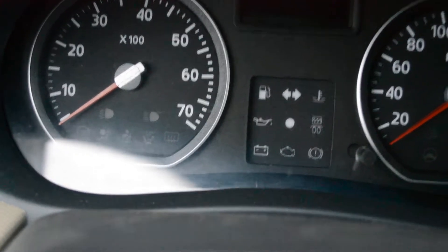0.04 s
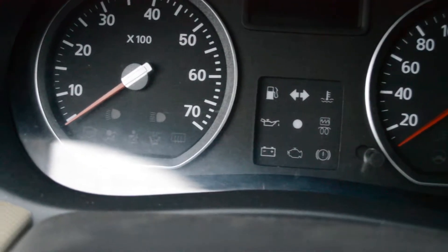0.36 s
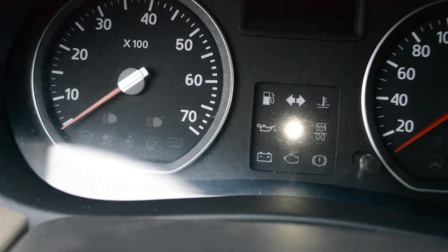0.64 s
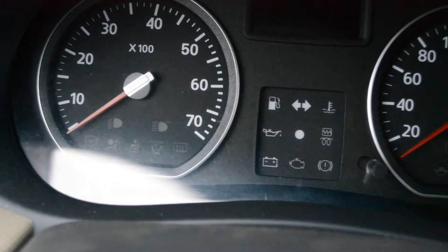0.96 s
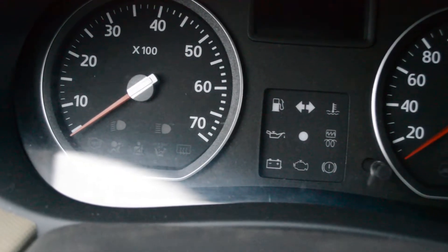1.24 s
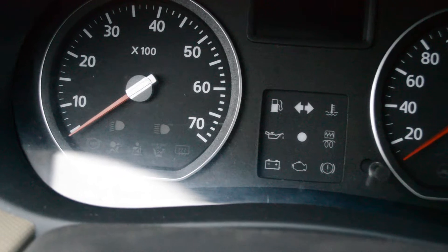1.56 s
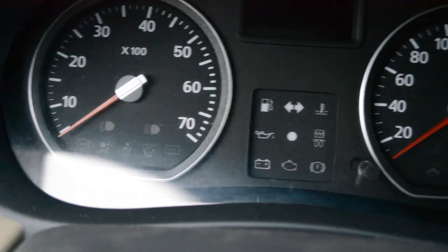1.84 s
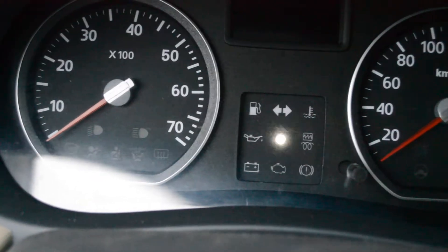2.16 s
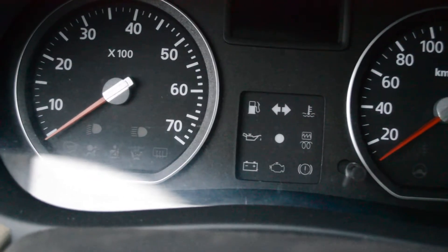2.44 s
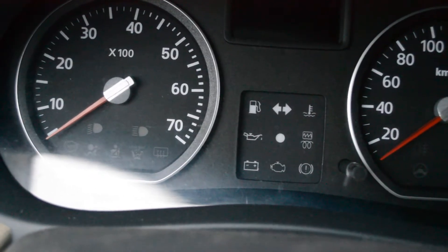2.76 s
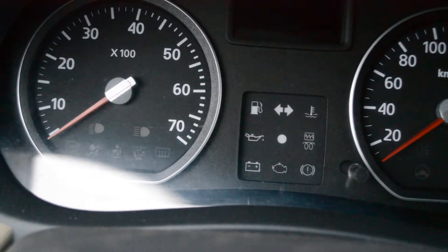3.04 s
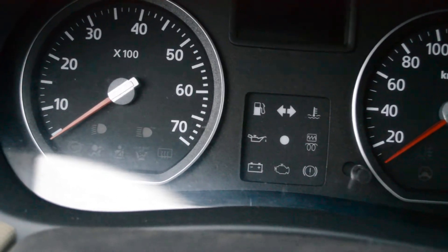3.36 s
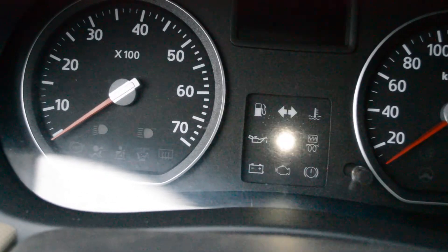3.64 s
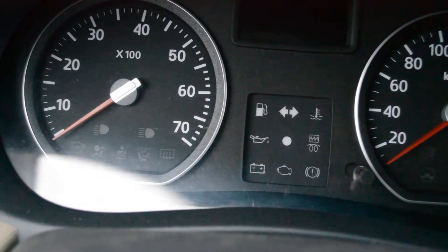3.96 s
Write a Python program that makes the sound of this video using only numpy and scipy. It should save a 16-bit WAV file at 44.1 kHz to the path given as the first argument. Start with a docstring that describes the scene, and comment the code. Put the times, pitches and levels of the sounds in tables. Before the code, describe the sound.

Sparse, close clicks of a key and plastic controls in a quiet car cabin: one sharp snap, brief scrapes, scattered soft ticks and bumps, and finally two clacks, over a faint sleeve rustle and low wavering hum.

```python
"""Key and controls in a parked car

A key and plastic controls are handled, close and dry. Impacts excite damped modes and brief noise:
one hard snap, light ticks, dull knocks and two gritty clacks. Friction gives short scrapes and a faint
rustle of cloth. Under it lie a low wavering hum, cabin air and the thin whine of a camera."""
import sys
import numpy as np
from scipy import signal
from scipy.fft import rfft, irfft, next_fast_len
from scipy.io import wavfile
from scipy.ndimage import map_coordinates

SR = 44100
rng = np.random.default_rng(int(sys.argv[2]) if len(sys.argv) > 2 else 0)


def waveform_to_disk(signal):
    """Save audio, clipped to [-1, 1], as 16-bit WAV at the path in sys.argv[1]."""
    frames = np.transpose(np.atleast_2d(signal))
    scaled = np.clip(frames, -1, 1) * 32767
    samples = np.round(scaled).astype(np.int16)
    wavfile.write(sys.argv[1], SR, samples)


N = 176400
T = np.arange(N) / SR
AGE = np.arange(SR // 4) / SR  # time since a contact began [s]

# spectrum of soft contact with trim or seat: (frequency [Hz], level [dB])
SOFT_CONTACT_SPECTRUM = [(100, -21), (410, 4), (630, -4), (810, -0.5), (1200, -8.5), (2600, -9.5),
                         (5000, -29.5), (14000, -40)]


def amp(db):
    """Amplitude ratio of a level in decibels."""
    return 10 ** (np.asarray(db) / 20)


def unit(x):
    """Normalisation to an rms of 1."""
    return x / np.sqrt(np.mean(x ** 2) + 1e-20)


def along(points, hz):
    """Interpolation of (frequency [Hz], value) points on a logarithmic frequency axis."""
    freqs, values = np.transpose(points)
    return np.interp(np.log(hz + 1), np.log(freqs + 1), values)


def filtered(x, response):
    """Linear filtering: the spectrum of x is multiplied by a frequency response."""
    size = next_fast_len(x.shape[-1] + SR // 10)
    spectrum = rfft(x, size) * response(np.fft.rfftfreq(size, 1 / SR))
    return irfft(spectrum, size)[..., :x.shape[-1]]


def noise(spectrum, size, tilt=0):
    """Spectral shaping of white noise to rms 1; tilt [dB/octave] acts above about 100 Hz."""
    response = lambda hz: amp(along(spectrum, hz) + tilt * np.log2(1 + hz / 100))
    return unit(filtered(rng.standard_normal(size), response))


def wobble(per_s, t):
    """Random modulation: a smooth curve through per_s random values a second."""
    return map_coordinates(rng.standard_normal(len(t) // 8), [t * per_s], mode="wrap")


def grain(t, depth_db, per_s):
    """Random amplitude modulation, heard as roughness."""
    return amp(depth_db * wobble(per_s, t))


def fade(t60, t=AGE):
    """Exponential decay by 60 dB in t60 seconds."""
    return np.exp(-np.log(1000) * np.maximum(t, 0) / t60)


def add(track, start, sound):
    """Superposition of a sound on the track from start [s]."""
    i = round(start * SR)
    track[i:i + len(sound)] += sound[:N - i]


def burst(spectrum, rise_s, decay, tilt=0, order=1):
    """Frequency-dependent damping: noise bands rise, then die by decay (frequency [Hz], t60 [s])."""
    centres = np.geomspace(100, 16000, 9)
    envelope = lambda hz: np.minimum(AGE / rise_s, 1) ** order * fade(along(decay, hz), AGE - rise_s)
    bank = lambda hz: np.array([along(np.c_[centres, row], hz) for row in np.eye(len(centres))])
    bands = filtered(noise(spectrum, len(AGE), tilt), bank)
    sound = sum(band * unit(envelope(hz)) for band, hz in zip(bands, centres))
    return unit(sound) * np.sqrt(np.mean(envelope(centres[-3]) ** 2))  # rms near 1 at its height


def ring(modes, attack_s, tilt=0):
    """Free vibration: a sum of damped modes whose levels and phases vary from blow to blow."""
    middle_hz = np.mean([mode[0] for mode in modes])
    tones = 0
    for hz, db, t60 in modes:
        gain = amp(db + rng.normal(0, 1) + tilt * np.log2(hz / middle_hz))
        tones += gain * fade(t60) * np.sin(2 * np.pi * (hz * AGE + rng.random()))
    return tones * (1 - np.exp(-AGE / attack_s))


def swells(strokes):
    """Gaussian envelopes, one for each stroke of a movement."""
    return sum(amp(db) * np.exp(-((T - centre) / half_width) ** 2) for centre, half_width, db in strokes)


def hum():
    """Random frequency modulation makes a low tone waver over a narrow-band rumble."""
    # envelope of the tone: (time [s], relative level [dB])
    levels = [(0, -41.5), (0.3, -45), (0.48, -38), (0.76, -36), (0.85, -44), (1.6, -42.5), (2.1, -48),
              (3.0, -48), (3.58, -45.5), (3.8, -54.5)]
    # spectrum of the rumble: (frequency [Hz], level [dB])
    rumble = [(20, -23), (38, -22), (58, -3.5), (78, -11), (120, -44.5)]
    pitch_hz, waver_hz = 64.5, 1
    phase = 2 * np.pi * np.cumsum(pitch_hz + waver_hz * wobble(7.8, T)) / SR
    envelope = amp(np.interp(T, *np.transpose(levels)) - 2.5)
    return envelope * unit(np.sin(phase)) + amp(-51.5) * noise(rumble, N)


def cabin_air():
    """Broadband noise of the cabin air, coloured by faint resonances."""
    # spectrum of the air: (frequency [Hz], level [dB])
    spectrum = [(20, -6), (90, 1), (180, 0), (300, -9), (1000, -11), (1450, -15), (4500, -18), (8000, -27),
                (10300, -22), (12500, -36)]
    # resonances: (frequency [Hz], bandwidth [Hz], level [dB])
    resonances = [(177.3, 28, 10.5), (953.6, 66, 5.5), (1107, 85, 3), (1963, 240, 0), (2699, 94, 5),
                  (3770, 150, -4.5), (4520, 243, -1)]
    response = lambda f: np.sqrt(sum(amp(db) ** 2 / (1 + (2 * (f - hz) / width) ** 2) ** 2
                                     for hz, width, db in resonances))
    return amp(-50) * noise(spectrum, N) + amp(-54) * unit(filtered(rng.standard_normal(N), response))


def camera_whine(hz=15669.5):
    """A steady pure tone near the upper limit of hearing."""
    return amp(-58) * unit(np.sin(2 * np.pi * hz * T))


def cloth():
    """Friction noise of fabric: a sleeve brushes past and the seat shuffles."""
    # strokes of the sleeve: (centre time [s], half width [s], level [dB])
    rustles = [(0.17, 0.23, -54.5), (0.74, 0.22, -52.5), (1.08, 0.092, -51.5), (1.21, 0.051, -54)]
    # spectrum of the sleeve: (frequency [Hz], level [dB])
    spectrum = [(2500, 1), (5200, 0.5), (7000, -2), (9700, 3), (14000, -13)]
    # movement on the seat: (centre time [s], half width [s], level [dB])
    shuffles = [(3.62, 0.3, -53.5)]
    sleeve = swells(rustles) * noise(spectrum, N) * grain(T, depth_db=1.7, per_s=45)
    seat = swells(shuffles) * noise(SOFT_CONTACT_SPECTRUM, N) * grain(T, depth_db=3, per_s=90)
    return sleeve + seat


def scrapes(edge_s=0.006):
    """Stick-slip friction of the key, filtered by the resonances of the plastic."""
    # strokes of the key: (time [s], duration [s], level [dB], tilt [dB/octave])
    strokes = [(0.034, 0.028, -46, -1.5), (0.193, 0.074, -49, 0), (0.262, 0.014, -38.5, 1.5),
               (0.274, 0.016, -32.5, -3.5), (0.29, 0.015, -35, 2), (0.417, 0.027, -47.5, -1),
               (1.807, 0.014, -45.5, -2.5)]
    # resonant spectrum of the plastic: (frequency [Hz], level [dB])
    spectrum = [(1150, -22), (1500, -6), (1950, 7), (2300, -3), (3500, -4), (3780, 9.5), (4050, -7),
                (6800, -4), (8300, 3), (10500, -5.5), (14000, -13), (16000, -27)]
    out = np.zeros(N)
    for start, duration, db, tilt in strokes:
        envelope = np.clip(np.minimum(AGE, duration + edge_s - AGE) / edge_s, 0, 1)
        friction = unit(noise(spectrum, len(AGE), tilt) * grain(AGE, depth_db=2.5, per_s=448))
        add(out, start - edge_s / 2, amp(db) * envelope * friction)
    return out


def knocks(rise_s=0.00098, t60=0.048):
    """Soft, heavily damped impacts on the trim put little energy into the treble."""
    # bumps: (time [s], level [dB], tilt [dB/octave])
    bumps = [(0.157, -35, 4.5), (0.4065, -41.5, -5), (1.1196, -32, -1.5), (1.1286, -31, -6),
             (1.339, -36.5, -3), (1.39, -40, 3), (3.048, -38, 2), (3.945, -39.5, 4)]
    out = np.zeros(N)
    for start, db, tilt in bumps:
        add(out, start, amp(db) * burst(SOFT_CONTACT_SPECTRUM, rise_s, [(1, t60)], tilt))
    return out


def ticks(crack_t60=0.024):
    """Light impacts excite the same few modes of one small plastic part."""
    # contacts: (time [s], relative level [dB], tilt [dB/octave], attack [s])
    contacts = [(0.154, -41.5, 6, 0.0011), (0.4052, -28, 3, 0.002), (1.1278, -30, 1, 0.0005),
                (1.6483, -31, 1, 0.00021), (1.7894, -34.5, 3.5, 0.00071), (2.2099, -34, 1.5, 0.00072),
                (3.0362, -37, 3, 0.0016)]
    # modes of the part: (frequency [Hz], level [dB], t60 [s])
    modes = [(1980, -7.5, 0.028), (2750, -11, 0.034), (3750, 2, 0.02), (9550, -17, .012)]
    # spectrum of the contact noise: (frequency [Hz], level [dB])
    spectrum = [(480, -4), (1500, -38), (2300, -3), (4000, -0.5), (5600, -16), (9300, -7.5), (12000, -18),
                (15500, -29)]
    out = np.zeros(N)
    for start, db, tilt, attack_s in contacts:
        crack = amp(1) * burst(spectrum, attack_s, [(1, crack_t60)], tilt)
        ringing = amp(2) * ring(modes, attack_s, tilt)
        add(out, start, amp(db) * (ringing + crack))
    return out


def clacks():
    """Many tiny impacts merge into noise as a part slides home; the panel behind rings in its modes."""
    # rushes of contacts: (time [s], level [dB], tilt [dB/octave], rise [s], base t60 [s])
    rushes = [(2.737, -30, -2.5, 0.005, 0.06), (2.7404, -20, 2, 0.0079, 0.037),
              (3.886, -9, 0, 0.0093, 0.043)]
    # spectrum of the contacts: (frequency [Hz], level [dB])
    spectrum = [(130, -12.5), (480, -9.5), (950, -4), (1400, -3.5), (2200, -6), (3500, -1), (7000, -7.5),
                (9500, -0.5), (11500, -9.5), (14000, -27)]
    # slower decay of the bass: (frequency [Hz], multiple of the base t60 [1])
    linger = [(150, 3.8), (800, 1.56), (9000, 1.15)]
    # blows on the panel: (time [s], level [dB], tilt [dB/octave], pitch ratio [1])
    thuds = [(2.7472, -38.5, 4.5, 0.89), (3.8935, -23, 0, 1)]
    # modes of the panel: (frequency at pitch ratio 1 [Hz], level [dB], t60 [s])
    panel_modes = [(139, -2.5, 0.13), (269, -4, 0.1), (412, -4, 0.095), (623.5, 0.5, 0.075),
                   (745, -4.5, 0.13), (1255, 11, 0.039), (1606, 9.5, 0.046), (1680, 5, 0.028),
                   (3290, 15, .03), (3840, 0, 0.018), (4700, 20, 0.022)]
    out = np.zeros(N)
    for start, db, tilt, rise_s, base_t60 in rushes:
        decay = [(hz, base_t60 * multiple) for hz, multiple in linger]
        rush = burst(spectrum, rise_s, decay, tilt, order=2)
        gritty = unit(rush * grain(AGE, depth_db=2, per_s=1100)) * rush.std()
        add(out, start, amp(db) * gritty)
    for start, db, tilt, pitch in thuds:
        modes = [(hz * pitch, level, t60) for hz, level, t60 in panel_modes]
        add(out, start, amp(db) * ring(modes, attack_s=0.005, tilt=tilt))
    return out


def snap(attack_s=0.00062):
    """Sudden release of elastic energy: a catch springs over with a crack and the plastic rings."""
    # release of the catch: (time [s], relative level [dB])
    releases = [(0.0995, -2)]
    # modes of the plastic: (frequency [Hz], level [dB], t60 [s])
    modes = [(630, -18, 0.022), (960, -21, .026), (1330, -12, 0.0085), (1974, -12, 0.014),
             (2560, -5, 0.014), (3615, -1, 0.009), (5400, 7, 0.0042), (9300, -1.5, 0.007)]
    # spectrum of the crack: (frequency [Hz], level [dB])
    spectrum = [(100, -24), (230, 0.5), (330, -15.5), (650, 8), (1600, 7), (5000, -2), (9800, 2),
                (13000, -10.5)]
    # damping of the crack: (frequency [Hz], t60 [s])
    decay = [(200, 0.043), (1000, 0.0093), (3000, 0.014), (12000, 0.0071)]
    out = np.zeros(N)
    for start, db in releases:
        ringing = amp(5.5) * ring(modes, attack_s)
        crack = amp(-1.5) * burst(spectrum, attack_s, decay)
        add(out, start, amp(db) * (ringing + crack))
    return out


def cabin_reverb(x):
    """Convolution with the cabin's impulse response, short and weak because upholstery absorbs sound."""
    # reverberation time: (frequency [Hz], t60 [s])
    decay = [(200, 0.21), (12000, 0.039)]
    tail = burst(spectrum=[(100, 16.5), (16000, -11.5)], rise_s=0.0005, decay=decay)
    return amp(-19) * signal.fftconvolve(x, tail / np.linalg.norm(tail))[:N]


def scene():
    """Superposition of the handling noises, their reverberation and the background, in one channel."""
    handling = snap() + ticks() + clacks() + knocks() + scrapes()
    return (handling + cabin_reverb(handling) + cloth() + hum() + cabin_air() + camera_whine())[None]


def record(dry, full_scale=0.95, top_hz=16300):
    """Hard clipping of the loudest peaks, followed by band limiting."""
    return filtered(np.clip(dry, -full_scale, full_scale), lambda hz: hz < top_hz)


dry = scene()
out = record(dry)
waveform_to_disk(out)
```